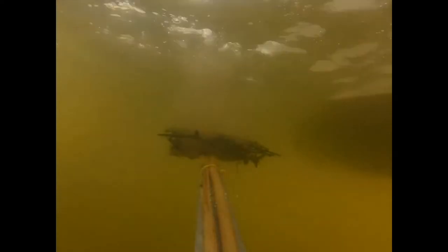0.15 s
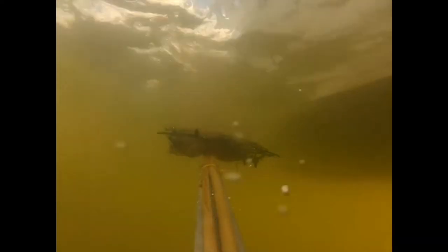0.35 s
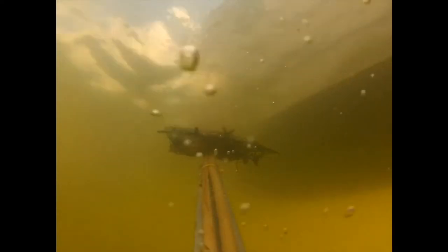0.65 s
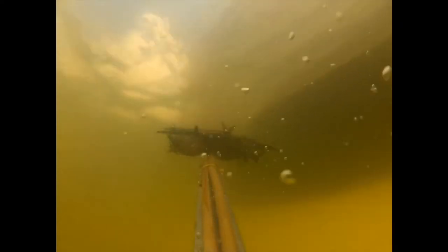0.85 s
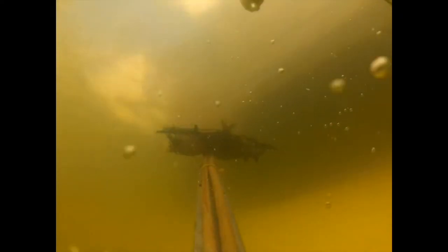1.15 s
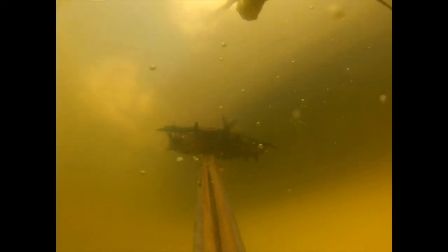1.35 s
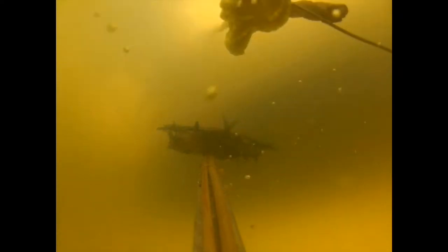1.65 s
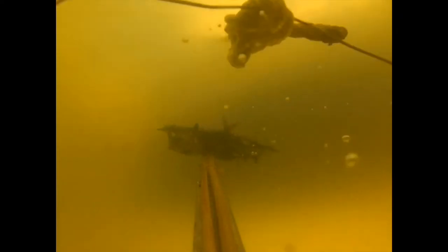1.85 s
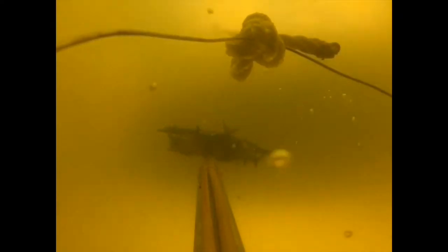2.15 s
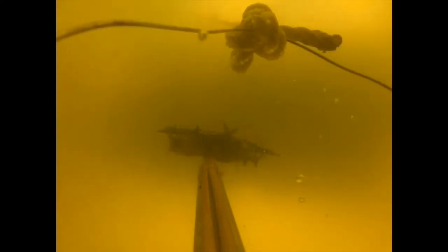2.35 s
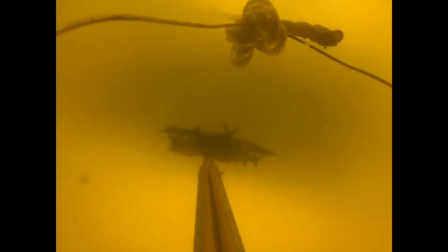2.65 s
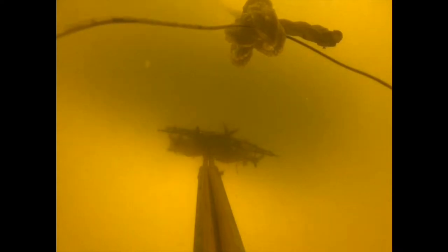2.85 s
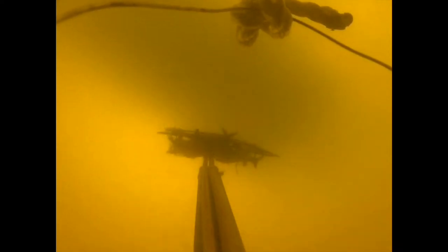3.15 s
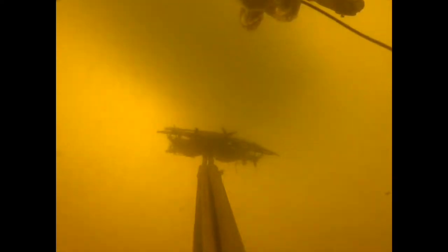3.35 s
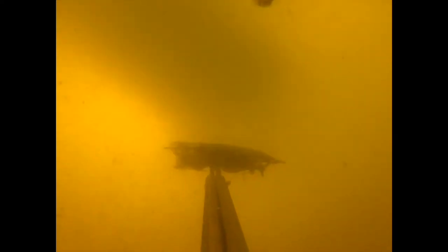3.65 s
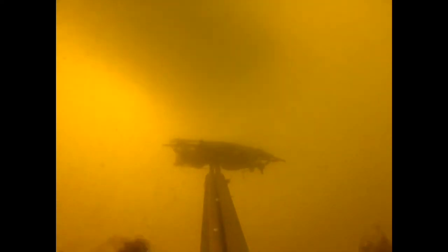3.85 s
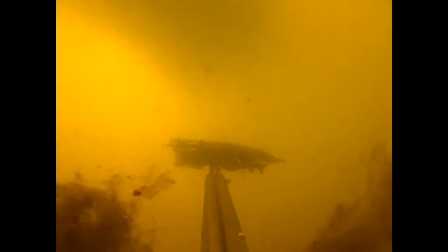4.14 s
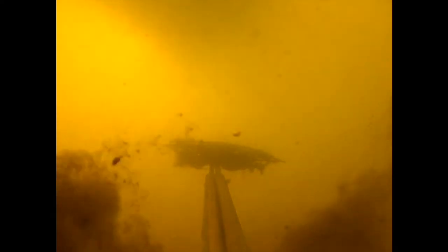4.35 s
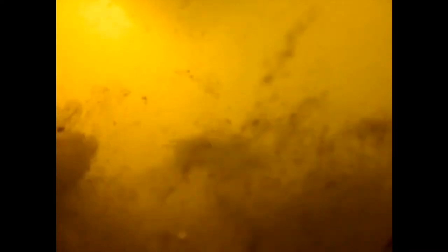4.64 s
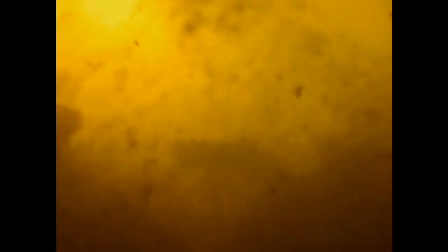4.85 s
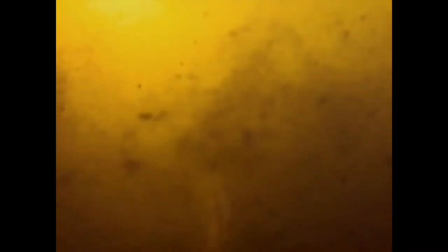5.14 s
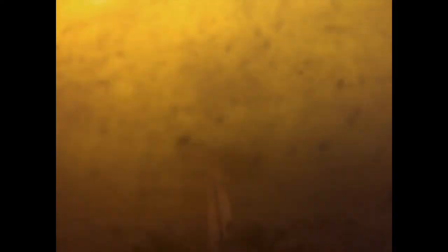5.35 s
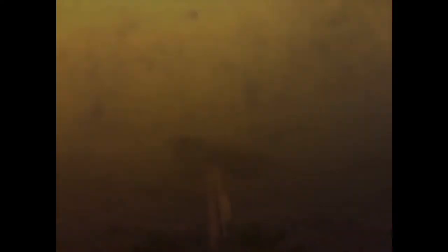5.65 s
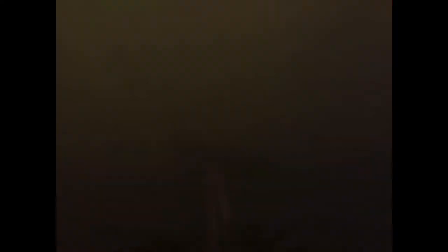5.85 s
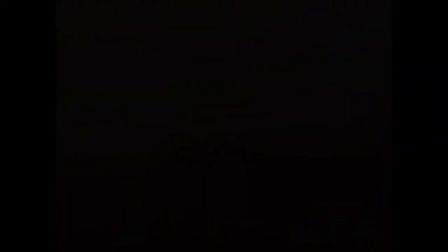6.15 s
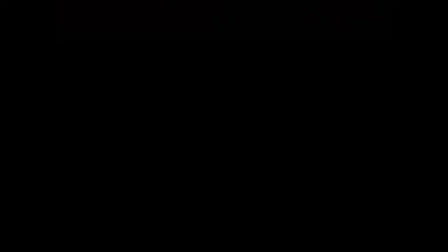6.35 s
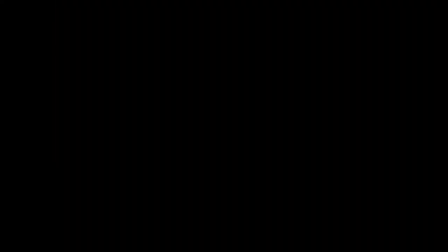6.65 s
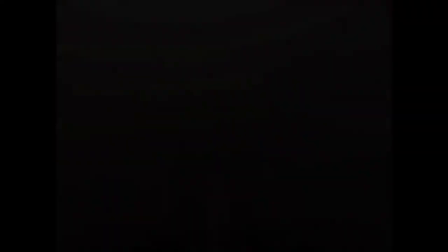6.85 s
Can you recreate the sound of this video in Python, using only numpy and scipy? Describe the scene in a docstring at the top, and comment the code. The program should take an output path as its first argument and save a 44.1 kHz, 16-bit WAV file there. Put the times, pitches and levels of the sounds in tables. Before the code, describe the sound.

Underwater, a camera housing on a pole bubbles, knocks hollowly and scrapes against a boat, then sinks into mud with duller taps and faint hiss.

```python
"""Air bubbles pop out of the gaps of a sealed camera housing on a pole, pushed under a river from a boat
and down into the mud: damped sines with noise ticks. The pole knocks and scrapes on the boat's side
(noise through housing resonances) and hums (an unsteady low sine); water surges round it (shaped noise).
The recorder adds hiss and holds each sample, which mirrors the sound into the treble; near the end
the level dips briefly and only a duller hiss returns."""
import sys
import numpy as np
from scipy import signal
from scipy.fft import rfft, irfft, next_fast_len
from scipy.io import wavfile
from scipy.ndimage import uniform_filter1d, map_coordinates

SR = 44100
rng = np.random.default_rng(int(sys.argv[2]) if len(sys.argv) > 2 else 0)


def int16_out(signal):
    """Quantize to a 16-bit WAV file."""
    q = np.round(np.clip(np.atleast_2d(signal).T, -1, 1) * 32767)
    wavfile.write(sys.argv[1], SR, q.astype(np.int16))


N = 308700
T = np.arange(N) / SR
MUD_S = 4.15  # the housing touches the bed

# shell modes, free in the water and pressed into the mud: pitch_hz, width_hz, relative level_db
SHELL_FREE = [(945, 290, 1), (1280, 580, 0.46), (2040, 350, 7.1), (2445, 540, 1.9)]
SHELL_MUD = [(1107, 64, 0.5), (1525, 27, -7), (1950, 140, -1), (2074, 39, 2), (2217, 100, -0.5),
             (2773, 200, -5), (888, 26, -9.5)]
# jolts that bend the pole: start_s, hold_s, level_db, pitch_hz
JOLTS = [(0.0, 0.091, -34, 93.5), (0.154, .14, -44, 89.6), (.335, .02, -35.5, 88.6), (0.394, .07, -42, 117),
         (0.563, .12, -46, 114.7), (0.756, 0.052, -27, 114.2), (0.846, .06, -29, 106),
         (0.941, .04, -27.5, 94.9), (1.007, .06, -32, 96.6), (1.109, .05, -26, 107),
         (1.17, 0.036, -17.5, 101.8), (1.248, .02, -26.5, 110.6), (1.287, .02, -21, 112.5),
         (1.339, .04, -26, 116.9), (1.489, 0.064, -26, 115.4), (1.58, .07, -27.5, 121),
         (1.694, 0.088, -25.5, 114.4), (1.901, .03, -32, 107), (1.973, 0.028, -28.5, 115.2),
         (2.106, .07, -46, 129), (2.325, .05, -48.5, 99.7), (2.418, 0.012, -40.5, 120.4),
         (2.474, .015, -39, 109.8), (2.531, 0.021, -35, 136.9), (2.578, 0.041, -46.5, 118.9),
         (2.692, 0.044, -52.5, 110.5), (2.805, 0.019, -42, 110), (2.903, .03, -40.5, 110.8),
         (2.986, 0.065, -49.5, 121.9), (3.147, 0.065, -30, 115), (3.238, 0.017, -20.5, 111.4),
         (3.369, 0.025, -15.5, 97.6), (3.43, .01, -24, 108.8), (3.475, 0.061, -37, 99.9),
         (3.576, .03, -39, 90.6), (3.719, 0.021, -52, 107.1), (3.851, .1, -51.5, 117.2),
         (4.31, 0.034, -62, 95), (4.427, 0.049, -49, 103.4), (4.62, 0.012, -37.5, 101),
         (4.66, 0.033, -47, 105.2), (4.847, 0.052, -50, 105), (4.999, 0.15, -62, 107.9),
         (5.189, 0.018, -56, 103.1), (5.394, 0.0083, -62, 105), (5.667, 0.031, -54, 112)]


def bubbles():
    """Each bubble rings at its own pitch, unsteady as its shape settles; its pinch-off tick taps the shell."""
    # bubbles: time_s (sounding 0.8 ms sooner), nominal peak_db, starting pitch_hz, t60_s, pinch-off tick_db
    bubble_table = [(.013, -40.5, 4040, 0.0096, -37), (.0233, -35, 4270, 0.0052, -47),
                    (.0441, -31, 2190, 0.012, -35.5), (0.045, -31.5, 3700, 0.0062, -54),
                    (0.062, -47, 2950, 0.012, -53), (0.0831, -22, 1610, 0.0053, -46),
                    (.0855, -36.5, 770, 0.023, -35), (.1084, -39.5, 3760, 0.013, -40),
                    (.1391, -26, 3870, 0.0095, -33.5), (0.157, -44, 3580, .018, -54),
                    (.1643, -37.5, 2510, 0.018, -61), (.173, -26.5, 1630, 0.01, -54),
                    (.174, -29.5, 1016, 0.021, -39.5), (.194, -34, 3450, 0.0097, -42),
                    (0.247, -41, 2170, 0.0049, -49), (0.295, -38, 1130, 0.028, -59),
                    (0.295, -43, 2310, 0.03, -58), (0.305, -30.5, 335, 0.047, -63),
                    (.311, -51, 3400, 0.036, -64), (.3262, -36.5, 2005, 0.033, -48),
                    (0.3363, -48.5, 2530, .041, -47), (0.341, -24.5, 360, 0.024, -46),
                    (.3924, -33.5, 2166, 0.016, -46), (.4325, -43, 2070, 0.015, -67),
                    (.4523, -7, 2060, 0.0079, -55), (0.4874, -30, 2060, 0.031, -49),
                    (0.498, -33.5, 314, 0.045, -62), (0.5714, -28, 5170, 0.0098, -33.5),
                    (0.5707, -22, 3390, .006, -38), (0.57, -35, 2064, .009, -48),
                    (0.592, -38, 3900, 0.0054, -41), (0.598, -28, 1990, 0.024, -34),
                    (0.614, -37.5, 302, 0.086, -49), (.618, -40, 5000, 0.0034, -42),
                    (.668, -37, 1866, 0.0064, -46), (0.674, -50, 3640, 0.024, -51),
                    (0.6933, -36, 2420, 0.016, -44), (.739, -16.5, 420, 0.016, -48),
                    (0.7489, -9, 2553, 0.014, -10.5), (1.6481, -9.5, 1879, 0.023, -16.5),
                    (2.2699, -55.5, 1251, .013, -70.5), (2.3144, -56.5, 1202, .029, -67),
                    (2.355, -52.5, 627, 0.11, -65), (2.5945, -38.5, 2280, 0.019, -57),
                    (2.661, -59, 1091, 0.1, -62), (3.2461, -10, 1981, 0.0072, -22.5),
                    (3.2612, -28, 3353, 0.026, -27), (3.262, -16.5, 1125, 0.0064, -39),
                    (3.2856, -32, 1060, 0.037, -24.5), (3.2868, -27, 4860, 0.0044, -36),
                    (3.343, -23.5, 3500, 0.012, -30), (3.407, -20.5, 2107, 0.025, -25),
                    (3.483, -17, 1840, 0.013, -25), (3.6111, -48, 2260, 0.0068, -49.5),
                    (4.026, -54.5, 1969, .019, -69), (4.61, -36.5, 304.5, 0.044, -59),
                    (4.657, -37, 294, .04, -51), (4.675, -32, 342, 0.032, -53),
                    (4.763, -41.5, 400, 0.071, -50), (4.845, -41.5, 396.3, .083, -60),
                    (4.9736, -38.5, 2167, 0.012, -44.5), (5.045, -47.5, 328, 0.056, -62.5),
                    (5.7375, -37, 2076, 0.016, -53.5), (5.828, -46.5, 1968, 0.011, -70.5),
                    (5.873, -56, 2260, 0.017, -66.5)]
    rings, ticks = np.zeros(N + SR), np.zeros(N + SR)
    t = np.arange(SR // 8) / SR
    for time_s, peak_db, pitch_hz, t60_s, tick_db in bubble_table:
        noise = rng.standard_normal((2, len(t)))
        rising = 2 * np.pi * pitch_hz * t * (1 + 1.1 * t)
        phase = rising + 0.035 * np.cumsum(noise[0])
        swell = (1 - np.exp(-t / (0.00074 + 0.47 / pitch_hz))) ** 2  # big bubbles start more softly
        fade = amp(-60 * t / t60_s) + amp(-20 - 60 * t / 0.019)  # with a weak after-ring
        start = round((time_s - .0008) * SR)
        rings[start:][:len(t)] += amp(peak_db + 7.5) * fade * swell * np.sin(phase)
        ticks[start:][:len(t)] += amp(tick_db - 60 * t / 0.016) * noise[1]
    rings, ticks = rings[:N], ticks[:N]
    return rings + ticks + 0.35 * housing(ticks, SHELL_FREE, SHELL_MUD)


def knocks():
    """A blow of a few milliseconds, then a rattle; the hollow takes the blow as one clean push."""
    # knocks on the boat's side: start_s, nominal peak_db, hollow_db, rattle t60_s
    knock_table = [(0.746, -3.5, -13, 0.026), (.861, -2.5, -12.5, 0.025), (.937, -9, -12, 0.056),
                   (1.087, -19.5, -22, 0.014), (1.117, -8, -12, 0.036), (1.157, -7.5, -17, 0.06),
                   (1.65, -18, -27, 0.056), (1.698, -20.5, -26.5, 0.1), (1.968, -29.5, -29.5, 0.099),
                   (2.42, -35, -40.5, .094), (2.474, -54.5, -50, .088), (2.529, -54.5, -51, 0.11),
                   (2.655, -57, -63, .05), (2.916, -37.5, -63, 0.062), (2.99, -30.5, -30.5, 0.12),
                   (3.174, -30.5, -28.5, 0.067), (3.207, -23, -32, 0.18), (3.365, -16, -16, 0.075),
                   (3.389, -17.5, -12, 0.056), (3.432, -16.5, -21.5, 0.18), (3.484, -13, -22.5, 0.07),
                   (3.55, -26.5, -38, 0.057), (4.228, -28.5, -32.5, .11), (4.433, -42, -47, 0.066),
                   (4.453, -33, -52, 0.1), (4.54, -37, -43, 0.067), (4.588, -41, -42, .086),
                   (4.611, -30.5, -39, 0.14), (4.66, -33.5, -46, 0.027), (4.672, -32.5, -42.5, 0.022),
                   (4.707, -40, -50, 0.065), (4.761, -44.5, -62, .07), (4.842, -43, -52, 0.068),
                   (4.871, -33.5, -44.5, 0.056), (5.041, -39, -52.5, 0.04), (5.192, -10, -20, 0.094),
                   (5.317, -35, -66, 0.047), (5.423, -28, -46, .03), (5.444, -30, -59, 0.028),
                   (5.476, -14.5, -19.5, 0.086), (5.535, -33.5, -51, 0.091), (5.602, -14, -23.5, 0.12),
                   (6.402, -45, -75.5, 0.12), (6.517, -46, -68.5, 0.13)]
    rattle_db, rattle_attack_s = -3, .0015
    shell_offset_db = -8.5  # against the peak
    upper_free_db, upper_mud_db = -18, -23.5  # small panels against the peak; the mud damps them
    force = np.zeros((3, N + SR))
    t = np.arange(SR // 4) / SR
    for start_s, peak_db, hollow_db, t60_s in knock_table:
        upper_db = upper_free_db if start_s < MUD_S else upper_mud_db
        blow = amp(-60 * t / 0.011) * (1 - np.exp(-t / 0.00045))
        rattle = amp(rattle_db - 60 * t / t60_s) * (1 - np.exp(-t / rattle_attack_s))
        contact = (blow * [[0], [1.5], [1.5]] + rattle) * rng.standard_normal((3, len(t)))
        contact[0, 44] += 12  # the push on the hollow, 1 ms in
        levels = amp([[hollow_db], [peak_db + shell_offset_db], [peak_db + upper_db]])
        force[:, round(start_s * SR):][:, :len(t)] += levels * contact
    return body(*force[:, :N])


def scrapes():
    """The pole drags in short strokes that start and stop within milliseconds and shake bubbles loose."""
    # strokes: start_s, length_s, shell_db, hollow_db, upper_db (small panels)
    stroke_table = [(0.763, 0.027, -45.5, -37, -57.5), (0.835, 0.017, -36.5, -31, -47),
                    (0.955, .055, -36.5, -36.5, -46), (1.043, .024, -34, -33.5, -44),
                    (1.1, 0.01, -54.5, -22.5, -59.5), (1.164, .038, -27, -26.5, -37.5),
                    (1.208, .04, -36.5, -37, -45), (1.252, .012, -49, -36, -58.5),
                    (1.283, .025, -51, -42, -55.5), (1.359, 0.024, -42.5, -44, -52),
                    (1.384, 0.029, -51, -28, -71.5), (1.448, 0.02165, -52, -32, -65),
                    (1.511, 0.042, -37, -30, -41), (1.595, 0.065, -52, -36, -60.5),
                    (1.731, 0.074, -53, -44.5, -52.5), (1.885, 0.042, -52.5, -44, -54.5),
                    (1.939, .047, -54, -42.5, -58.5), (2.144, 0.023, -65.5, -54.5, -73.5),
                    (2.348, 0.014, -67, -51.5, -69.5), (2.673, 0.0314, -66, -54.5, -67),
                    (2.793, .04, -64.5, -54, -68.5), (2.895, 0.025, -58.5, -49.5, -60),
                    (3.112, 0.037, -55.5, -49, -62), (3.147, .13, -45.5, -39.5, -58.5),
                    (3.334, 0.037, -45, -41.5, -59), (3.419, 0.062, -27, -31.5, -31),
                    (3.496, .022, -52, -37, -69.5), (3.536, 0.04, -42, -34, -45.5),
                    (3.713, 0.022, -59, -55, -64.5), (3.741, 0.022, -67, -64, -80),
                    (3.809, 0.0311, -61.5, -66.5, -69), (3.833, 0.066, -61, -48, -68),
                    (4.82, 0.036, -62, -54.5, -61.5), (5.306, 0.042, -60, -58, -82),
                    (5.439, 0.035, -47, -41.5, -76)]
    attack_s, release_s = .004, .006
    push = np.zeros((3, N))
    for start_s, length_s, shell_db, hollow_db, upper_db in stroke_table:
        rise = (T - start_s) / attack_s
        fall = (start_s + length_s - T) / release_s + 1
        stroke = np.clip(np.minimum(rise, fall), 0, 1)
        push += amp([[hollow_db], [shell_db], [upper_db]]) * stroke
    hollow, shell, upper = push
    slips = wobble(90)
    drag = body(hollow * grit(slips, clump_db=3.0, grain_db=1.5),
                shell * grit(slips, clump_db=2, grain_db=2.5),
                upper * grit(slips, clump_db=2.5, grain_db=-1.5))
    small_bubbles = .27 * ringing(shell * froth(400, 800, 4000, cycles=3.2), SHELL_FREE)
    large_bubbles = 0.54 * hollow * (T < MUD_S) * froth(140, 300, 1300, cycles=20)
    return drag + small_bubbles + large_bubbles


def hum():
    """The pole swings at a pitch set by its grip at each jolt; its other bending modes blur round it."""
    # bending modes of the pole: pitch_hz, width_hz, relative level_db
    pole_modes = [(121.4, 29, 3), (88, 24, -2), (134, 3.8, -13), (224, 37, -19)]
    start_s, hold_s, _, pitch_hz = np.transpose(JOLTS)
    gliding_hz = np.interp(T, start_s + hold_s / 2, pitch_hz)
    unsteady_hz = gliding_hz * (1 + .04 * wobble(20))
    swing = np.sqrt(2) * amp(2.5 * wobble(25)) * np.sin(2 * np.pi * np.cumsum(unsteady_hz) / SR)
    blur = unit(ringing(rng.standard_normal(N), pole_modes))
    return jolting() * (.85 * swing + 0.5 * blur)


def jolting():
    """Strength of the pole's swing: each jolt rises fast, holds and dies away."""
    rise_db_per_s, fall_db_per_s = 1500, 520
    power = np.zeros(N)
    for start_s, hold_s, level_db, _ in JOLTS:
        rise_db = rise_db_per_s * np.maximum(start_s - T, 0)
        fall_db = fall_db_per_s * np.maximum(T - start_s - hold_s, 0)
        power += amp(level_db - rise_db - fall_db) ** 2
    return np.sqrt(power)


def handling():
    """Water surges past, keeps the housing faintly shaking, gurgles and carries froth."""
    # water round the pole: time_s and nominal surge_db, rub_db (housing), rustle_db (shell)
    handling_table = [(0.0, -30, -46, -54.5), (0.07, -38, -45.5, -54.5), (0.4, -51.5, -48, -63),
                      (0.68, -44.5, -52, -61.5), (0.85, -41, -41.5, -51.5), (1.0, -37.5, -43, -44),
                      (1.19, -29, -39, -44), (1.3, -39, -44, -53.5), (1.47, -35, -35, -48),
                      (1.7, -63, -41, -47.5), (1.78, -39, -47, -56.5), (2.0, -48.5, -61.5, -66.5),
                      (2.27, -54.5, -67, -79.5), (2.6, -48, -59.5, -70), (2.9, -52, -68, -75.5),
                      (3.1, -42.5, -54.5, -59), (3.3, -65, -52, -52.5), (3.41, -21.5, -35, -47),
                      (3.52, -53.5, -59.5, -56.5), (3.7, -65, -65, -80), (4.2, -81, -75.5, -88.5),
                      (4.28, -79, -54.5, -66.5), (4.42, -73.5, -57.5, -61), (4.63, -54, -48.5, -58),
                      (4.95, -62.5, -61, -67), (5.16, -71.5, -70, -76), (5.25, -73, -44.5, -55),
                      (5.42, -71, -45.5, -48), (5.62, -74.5, -44, -56.5), (5.82, -79, -60, -63.5),
                      (6.05, -74, -68, -73.5), (7.0, -68, -74.5, -70.5)]
    # colour of the surge: frequency_hz, relative level_db per Hz
    surge_colour = [(12, -25), (25, -8), (44, -3.5), (70, -9.5), (200, -23.5), (400, -42), (800, -120)]
    # colour of water gurgling in the housing's gaps: frequency_hz, relative level_db per Hz
    gurgle_colour = [(120, -30), (200, -5.5), (350, 1.5), (650, -3.5), (780, -25.5), (1200, -60)]
    slosh_db, slosh_per_s = 2, 9  # the surge comes in uneven sloshes
    jolt_surge_db = -18  # water thrown past the housing by a jolt
    surge_db, rub_db, rustle_db = curves(handling_table)

    slips = wobble(30)
    rub = amp(rub_db - 4.5) * grit(slips, clump_db=6, grain_db=1.5)
    rustle = amp(rustle_db - 4) * grit(slips, clump_db=4.5, grain_db=4.0)
    shaking = body(rub, rustle, amp(-10) * rustle)

    fine_froth = amp(rustle_db - 9.5) * froth(140, 1600, 4500, cycles=14)
    coarse_froth = amp(rub_db - 10) * froth(90, 180, 850, cycles=14)
    gurgle = amp(rub_db - 7.5 + 2.5 * wobble(40)) * coloured(gurgle_colour)
    fizz = (fine_froth + coarse_froth + gurgle) * (T < MUD_S)  # none inside the mud

    surge = amp(surge_db + slosh_db * wobble(slosh_per_s)) + amp(jolt_surge_db) * jolting()
    return surge * coloured(surge_colour) + shaking + fizz


def froth(rate, low_hz, high_hz, cycles):
    """A swarm of small bubbles of rms 1, rate a second: damped sines of random pitch and size."""
    when, pitch, size = rng.random((int(rate * N / SR), 3)).T
    hz = low_hz * (high_hz / low_hz) ** pitch[:, None]
    t = np.arange(900) / SR
    fade = amp(-4 * np.log(size[:, None] + 0.0045) - 60 * t * hz / cycles)
    rings = fade * (1 - np.exp(-t * hz)) * np.sin(2 * np.pi * hz * t * (1 + 3 * t))
    where = (when[:, None] * N).astype(int) + np.arange(len(t))
    return unit(np.bincount(where.ravel(), rings.ravel(), N + len(t))[:N])


def grit(slips, clump_db, grain_db):
    """A rough force of rms 1: noise in clumps and short grains, its colour changing in patches."""
    z = signal.stft(rng.standard_normal(N), nperseg=256)[2]
    patches = uniform_filter1d(rng.standard_normal(z.shape), size=3, axis=0)  # across frequency
    patches = uniform_filter1d(patches, size=6, axis=1)  # across time
    noise = signal.istft(z * amp(3.5 * unit(patches)), nperseg=256)[1][:N]
    return unit(amp(clump_db * slips + grain_db * wobble(400)) * noise)


def body(hollow, shell, upper):
    """Three forces ring the hollow, the shell and its small panels."""
    # hollow modes, free in the water and pressed into the mud: pitch_hz, width_hz, relative level_db
    hollow_free = [(485, 49, 3), (629, 22, -2.5), (353, 170, -13.5), (712, 80, -7), (212, 64, -14.5)]
    hollow_mud = [(624, 33, 4), (381, 51, -5.5), (784, 11, -4), (237, 77, -24)]
    # small panels, the same throughout: pitch_hz, width_hz, relative level_db
    upper_modes = [(3020, 460, 1), (3920, 200, -2.5), (4185, 170, -2), (5210, 590, -4.5), (5526, 510, -6.5)]
    low = housing(hollow, hollow_free, hollow_mud)
    middle = housing(shell, SHELL_FREE, SHELL_MUD)
    return low + middle + ringing(upper, upper_modes)


def housing(force, free, mud):
    """The modes shift once the mud grips the housing."""
    return ringing(force * (T < MUD_S), free) + ringing(force * (T >= MUD_S), mud)


def ringing(force, modes):
    """A force through resonances that fall off steeply above the last; white noise keeps its rms."""
    edge_hz = 0.92 * max(modes)[0]

    def response(f):
        """Modes of alternating sign, then a second-order low-pass."""
        peaks = 0
        for k, (pitch_hz, width_hz, level_db) in enumerate(sorted(modes)):
            damping = 1j * f * width_hz
            peaks = peaks + (-1) ** k * amp(level_db) * damping / (pitch_hz ** 2 - f * f + damping)
        return peaks / (1 - (f / edge_hz) ** 2 + 1.4j * f / edge_hz)

    gain = np.sqrt(np.mean(np.abs(response(np.linspace(0, SR / 2, num=4096))) ** 2))
    return filtered(force, response) / gain


def coloured(points):
    """Noise of rms 1 with a (frequency_hz, level_db) spectrum."""
    f, db = np.transpose(points)
    response = lambda hz: amp(np.interp(np.log(hz + 1), np.log(f), db))
    return unit(filtered(rng.standard_normal(N), response))


def filtered(x, response):
    """x times a complex response of frequency."""
    m = next_fast_len(N + SR // 2)
    return irfft(rfft(x, m) * response(np.fft.rfftfreq(m, 1 / SR)), m)[..., :N]


def wobble(rate):
    """A smooth random curve, rate knots a second."""
    return map_coordinates(rng.standard_normal(int(N * rate / SR) + 4), [T * rate])


def curves(rows):
    """One value per sample for each column after the time."""
    s, *columns = np.transpose(rows)
    return [np.interp(T, s, column) for column in columns]


def amp(db):
    """dB to gain."""
    return 10 ** (np.asarray(db) / 20)


def unit(x):
    """Scaled to rms 1."""
    return x / np.sqrt(np.mean(x ** 2) + 1e-20)


def scene():
    """One microphone inside the housing feeds both channels."""
    return np.tile(bubbles() + knocks() + scrapes() + hum() + handling(), (2, 1))


def record(dry):
    """Noise of the electronics, soft overload, low-pass, samples held at a low rate, dip, band limit."""
    # colour of the recorder's noise: frequency_hz, relative level_db per Hz
    hiss_colour = [(24, -47), (40, -14.5), (118, -2), (264, -6.5), (448, -12), (637, -17), (1190, -22.5),
                   (2240, -27), (4500, -28.5), (6500, -36)]
    # colour of the duller hiss left at the end: frequency_hz, relative level_db per Hz
    late_hiss_colour = [(24, -33.5), (40, -2), (104, -2), (221, -6), (653, -19), (1460, -23), (3500, -29.5),
                        (4000, -44.5), (4500, -31), (9900, -40.5), (10300, -73)]
    # brief dip, after whose middle only the duller hiss is left: middle_s, width_s, level_db
    dip = (6.648, .014, -20)
    hiss_db, late_hiss_db = -63.5, -62  # before the filters that follow each
    hold_hz, top_hz = 12000, 16500

    noisy = dry + amp(hiss_db) * coloured(hiss_colour)
    squeezed = noisy / (1 + np.abs(noisy / .6) ** 4) ** .25  # the input stage rounds off the loudest blows
    kept = filtered(squeezed, lambda hz: 1 / (1 + (hz / 5850) ** 40))
    mirrored = kept * (1 + 2 * np.cos(2 * np.pi * hold_hz * T))  # sampling copies the band round its rate
    # the hold droops to a null at the sample rate
    held = filtered(mirrored, lambda hz: np.sinc(hz / hold_hz) / (1 + (hz / 15500) ** 30))

    middle_s, width_s, dip_db = dip
    heard = np.where(T < middle_s, held, amp(late_hiss_db) * coloured(late_hiss_colour))
    # the channels differ slightly, most in the bass
    apart = amp(-19) * filtered(np.roll(heard[0], 300), lambda hz: .05 + 1 / (1 + (hz / 50) ** 1.5))
    dipping = amp(dip_db * np.exp(-((T - middle_s) / width_s) ** 2))
    both = (heard + [apart, -apart]) * dipping
    return filtered(both, lambda hz: hz < top_hz)


dry = scene()
out = record(dry)
int16_out(out)
```